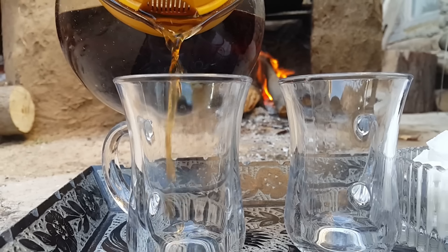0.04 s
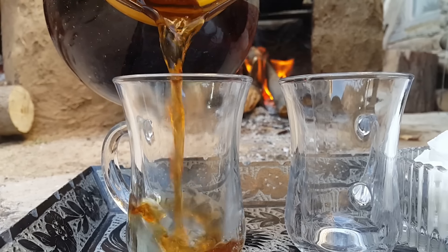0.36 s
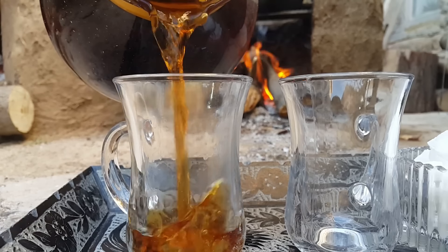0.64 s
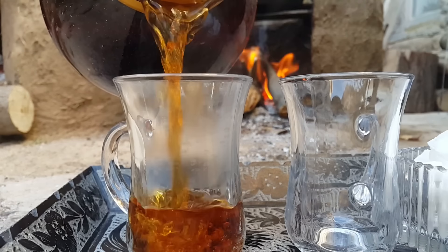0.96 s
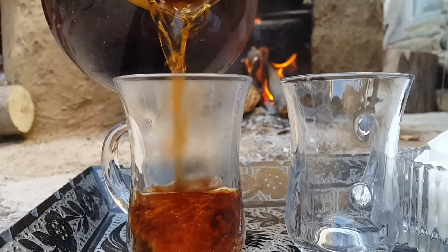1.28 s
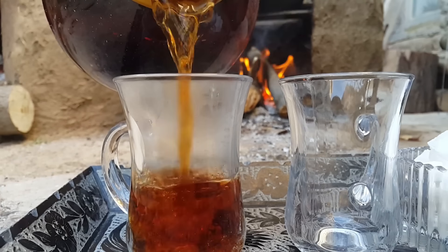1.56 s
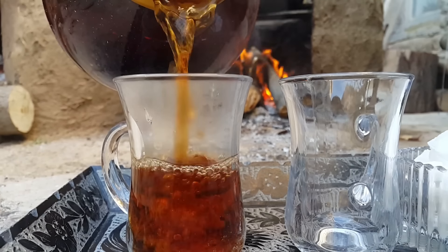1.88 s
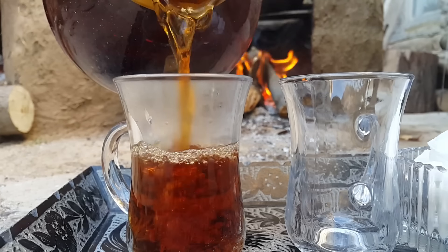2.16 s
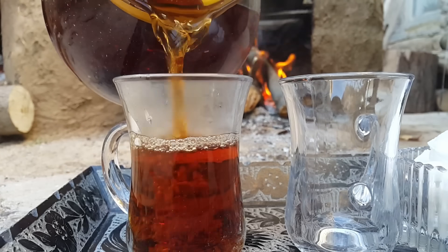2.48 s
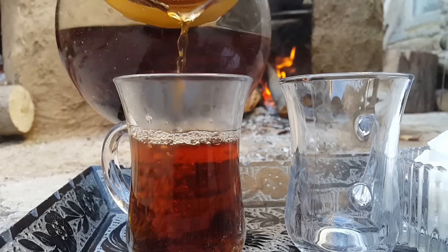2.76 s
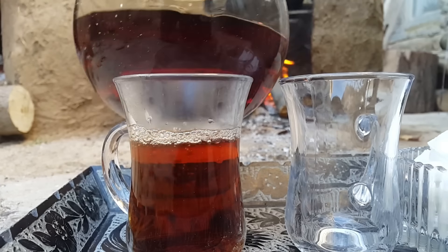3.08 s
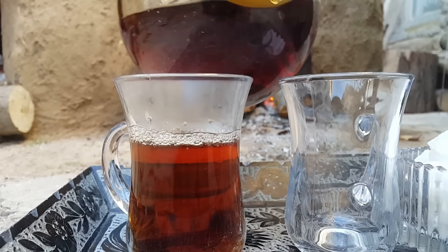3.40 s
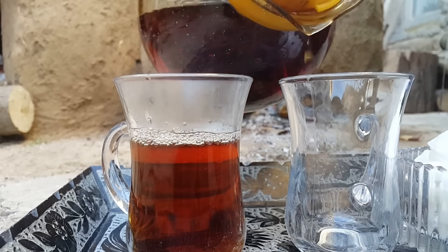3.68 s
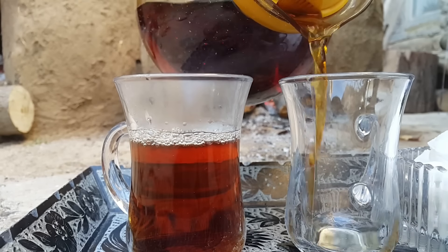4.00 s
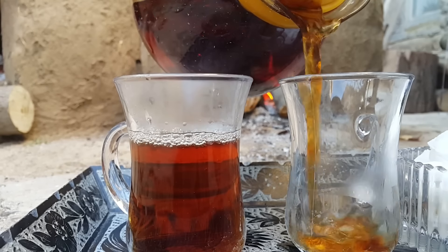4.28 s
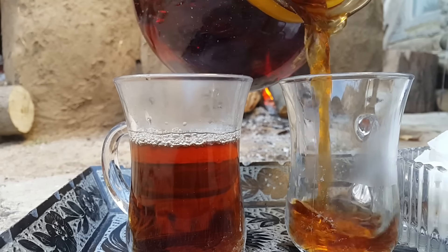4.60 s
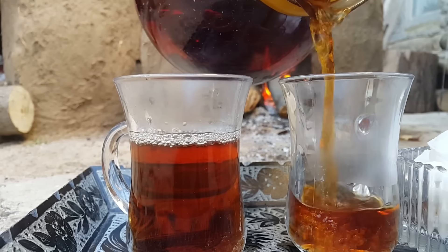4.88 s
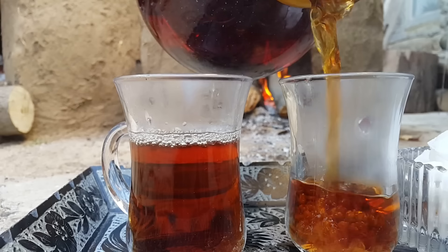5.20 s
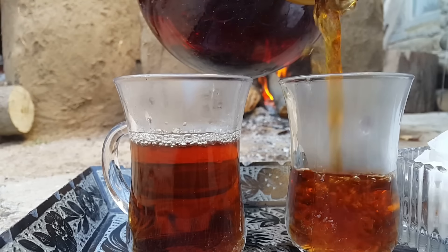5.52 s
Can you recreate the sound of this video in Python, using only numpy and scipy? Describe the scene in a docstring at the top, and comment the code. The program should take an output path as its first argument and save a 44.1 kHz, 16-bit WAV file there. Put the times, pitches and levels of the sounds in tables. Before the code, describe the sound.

Hot tea is poured from a glass teapot into a small glass, close to the microphone. The stream bubbles and gurgles, with small plops, ticking droplets and a light fizz of foam. It tails off and the pot knocks once. After a short pause, a second pour splashes into another glass. A soft hiss and the faint, low flutter of a fire lie behind it all.

```python
"""Hot tea is poured from a glass teapot into two small glasses on a metal tray, close by.
The stream traps bubbles. They ring in clear tea and turn into dull plops as it gets frothy.
The tea's own note sinks, while the shrinking column of air above it rings higher.
Droplets tick and foam fizzes. Between the pours the pot knocks once.
Behind it all are a soft hiss and the low flutter of a fire."""
import sys
import numpy as np
from scipy import signal
from scipy.fft import rfft, irfft
from scipy.io import wavfile
from scipy.ndimage import uniform_filter1d

SR = 44100
rng = np.random.default_rng(int(sys.argv[2]) if len(sys.argv) > 2 else 0)


def digitize_waveform(pressure):
    """Quantize a signal to 16-bit integers and store it at the path in sys.argv[1].

    Rows of a 2-D input are taken as channels; values are limited to [-1, 1].
    """
    field = np.atleast_2d(pressure).T
    bounded = np.clip(field, -1, 1)
    quanta = np.round(bounded * 32767).astype(np.int16)
    wavfile.write(sys.argv[1], SR, quanta)


N = 249165
TIME = np.arange(N) / SR

# The tone of the hiss and the fire. Each row: frequency in Hz, relative level in dB.
BACKGROUND_TONE = [(15, -49), (25, -27), (55, -11.5), (92, -9.5), (135, -2.5), (240, -5.5), (299, -9),
                   (371, -15), (473, -12), (620, -15.5), (791, -8), (929, -14.5), (1180, -14.5),
                   (1390, -25), (2000, -18), (2700, -16), (3050, -13.5), (3600, -17.5), (4050, -15.5),
                   (4950, -21), (7630, -41.5), (15800, -37)]
# How alike the background is in both ears. Each row: frequency in Hz, likeness (1 means the same).
EAR_LIKENESS = [(60, 0.95), (290, 0.91), (700, 0.95), (1400, 0.28), (2600, 0.15), (4400, -0.062),
                (15000, -0.04)]
# The fire's low puffs. Each row: start in seconds, level in dB, pitch in Hz.
FIRE_PUFFS = [(0.11, -50, 248), (0.511, -42, 224), (0.944, -45, 236), (3.182, -47, 220),
              (3.261, -43.5, 232), (3.575, -41.5, 203), (3.737, -43, 234), (4.613, -42.5, 226),
              (4.695, -44.5, 246), (5.096, -44.5, 230), (5.245, -39.5, 230), (5.521, -38, 236)]
# The echo of the walls. Each row: frequency in Hz, seconds it takes to fade by 60 dB.
WALL_FADES = [(150, 0.38), (800, 0.12), (3000, 0.35), (12000, 0.027)]
# Echoes off the pot, the tray and the other glass.
# Each row: left delay in seconds, right delay in seconds, level in dB.
NEAR_ECHOES = [(.0019, 0.0033, -52), (.0033, 0.00291, -26.5), (.0061, .0068, -18.5)]
# The pot touches, lands and chatters once. Each row: start in seconds, relative level in dB.
POT_CONTACTS = [(3.1218, -13.7), (3.1239, 0), (3.1263, -11.7)]
# The notes of the knocked pot. Each row: pitch in Hz, relative level in dB,
# seconds to fade by 60 dB, how much louder it is on the left in dB.
POT_NOTES = [(169, -37.0, 0.203, 1), (359, -46, 0.129, 0), (485, -37.0, 0.097, -1), (650, -38, 0.11, 4),
             (824, -20.5, 0.115, -3), (889, -24, 0.09, -1), (944, -13.5, 0.039, -1),
             (1087, -4.4, 0.014, -7), (1211, -15, 0.042, -9), (1294, -13.4, 0.03, -5),
             (1449, -15, 0.025, -2), (1581, -37, 0.08, 1), (1728, -27, 0.075, -3), (1950, -27, 0.045, -3),
             (2214, -32.0, 0.028, 3), (2620, -26.5, 0.04, 3), (2800, -24.5, 0.027, 5),
             (3380, -32.0, 0.03, -8), (3686, -33, 0.024, -6), (4410, -34, 0.02, 1), (8560, -60, 0.06, 0),
             (9400, -59, 0.05, 0), (10450, -59, 0.05, 0)]
# The tone of four noises: the pot's crack, foam, droplets and wet slaps.
# Each row: frequency in Hz, relative level in dB.
CRACK_TONE = [(100, -27), (500, -3), (1200, 2.5), (2600, -9), (4500, -13), (6000, -28), (9000, -24.5),
              (15500, -36)]
FOAM_TONE = [(800, -1), (1800, -0.5), (2600, 0), (3900, 1.5), (5000, -4), (7000, -23), (15500, -24.5)]
DROPLET_TONE = [(800, -10), (1450, 18), (2000, 7), (2700, 4.5), (4000, -1), (5300, -6.5), (5750, -4),
                (6500, -15.5), (9500, -17.5), (15500, -12.5)]
SLAP_TONE = [(800, -1), (1900, 2), (3900, -3), (5000, -11), (7000, -33), (15500, -38)]
# Droplets hitting the tea (duller) or the side of the glass (brighter).
# Each row: start in seconds, relative level in dB, a value in Hz that sets how bright the tick is.
DROPLETS = [(0.6385, -48, 6200), (0.6414, -42, 2200), (0.6496, -42.5, 5460), (0.683, -40.5, 3300),
            (0.689, -40, 3000), (0.7505, -42.5, 2400), (0.761, -46, 5000), (0.7727, -44, 2600),
            (0.801, -41.5, 3200), (0.813, -53, 13000), (0.9617, -54, 6500), (0.922, -47, 2700),
            (0.9275, -46, 3320), (0.993, -47, 2594), (1.012, -51, 12000), (1.029, -48, 7500),
            (1.0433, -56, 11000), (1.06, -43.5, 7500), (1.171, -51, 8000), (1.212, -40, 6000),
            (1.231, -43, 5800), (1.269, -50, 9500), (1.277, -40, 5750), (1.2886, -52, 6500),
            (1.304, -58, 4500), (1.3856, -49, 4200), (1.4132, -50, 3000), (1.484, -52, 8000),
            (1.4925, -42, 3600), (1.508, -42, 3000), (1.659, -38.5, 3600), (1.724, -57, 10000),
            (1.7355, -39, 1800), (1.761, -44, 7000), (1.787, -52, 11000), (1.8165, -48, 8000),
            (1.8352, -44, 4000), (1.883, -40, 6030), (1.909, -42.5, 2820), (1.982, -54, 11000),
            (2.011, -45, 2000), (2.0443, -53, 12000), (2.0616, -58, 12000), (2.0895, -42, 2194),
            (2.1414, -54, 8000), (2.148, -43, 3200), (2.169, -48, 3600), (2.2127, -44, 2600),
            (2.2356, -45, 4200), (2.2515, -46, 2000), (2.366, -45, 6460), (2.3745, -40, 2400),
            (2.377, -41.5, 7200), (2.405, -56, 10900), (2.4136, -53, 11000), (2.4197, -42.5, 2000),
            (2.4452, -52, 10000), (2.5296, -51, 10000), (2.5965, -41.5, 5030), (2.6696, -53, 9000),
            (2.692, -44.5, 2400), (2.7132, -43, 2600), (2.7257, -45, 2800), (2.7507, -47, 4000),
            (2.7578, -47.5, 9900), (2.7712, -40.5, 2100), (2.8283, -60, 12000), (2.8897, -55, 12000),
            (2.9075, -50, 11000), (2.935, -48, 7000), (2.943, -39.5, 2000), (3.024, -38, 2000),
            (4.359, -50, 7000), (4.482, -44, 4000), (4.492, -44, 2800), (4.542, -42, 3800),
            (4.5643, -51, 2600), (4.783, -40, 3570), (5.0114, -51, 4500), (5.031, -50, 3800),
            (5.1203, -48, 4000), (5.2664, -45, 4000), (5.3114, -44, 1900), (5.3564, -47, 8000),
            (5.3696, -41, 5000), (5.5186, -56, 8000), (5.5398, -43, 2200), (5.5605, -37.5, 2400),
            (5.561, -50, 13000), (5.5948, -53, 9000), (5.6116, -53, 10000)]
# Small bubbles at the surface. Each row: start in seconds, relative level in dB, pitch in Hz.
SURFACE_BUBBLES = [(0.6885, -39, 1700), (0.7603, -34, 3680), (0.9225, -39, 2650), (0.9285, -35, 3100),
                   (1.2296, -24, 3670), (1.2768, -29, 3650), (1.4126, -36, 2550), (1.4932, -35, 1860),
                   (1.4941, -35, 3630), (1.658, -36, 1900), (1.884, -31, 3830), (2.1683, -37, 1900),
                   (2.149, -32, 3800), (2.5302, -31, 1885), (2.596, -39, 1900), (3.0242, -33, 2000),
                   (4.364, -45, 4250), (4.395, -45, 4100), (4.483, -38, 4160), (4.4918, -36, 4160),
                   (4.539, -39, 2315), (4.654, -32.5, 3890), (4.7695, -41, 1480), (4.784, -37, 1570),
                   (4.841, -40, 1450), (5.0115, -41, 3070), (5.0838, -36, 3520), (5.295, -38, 3760),
                   (5.3568, -40, 4020), (5.54, -39, 3770), (5.5606, -37, 1550), (5.6115, -38, 3400),
                   (5.6138, -33, 4150)]
# Plops of air trapped by the stream. Each row: start in seconds, relative thud level in dB,
# relative ring level in dB, the note heard in Hz (often the glass's note near 1080 Hz),
# cycles for that note to fade to about a third.
PLOP_EVENTS = [(0.2712, -40, -46, 890, 0.71), (0.303, -41, -45.5, 930, 0.87), (0.3405, -49, -48, 796, 1.7),
               (0.6413, -36, -31.5, 1013, 2.9), (0.6835, -45, -36, 1140, 1.9),
               (0.6897, -30, -31.5, 1310, 7.1), (0.759, -39, -38.5, 1053, 10),
               (0.7667, -44, -38.5, 1056, 6.1), (0.801, -38, -30.5, 1070, 5.5),
               (0.922, -41.0, -45.5, 1042, 14), (0.9565, -30, -37, 1070, 4.6),
               (0.9624, -18.5, -28, 1075, 7.4), (1.0023, -36, -27.5, 1346, 8.6),
               (1.0115, -25, -28, 774, 3.8), (1.028, -52, -28.5, 1130, 2.3),
               (1.0594, -39, -27.5, 1088, 7.3), (1.0792, -27, -31, 1252, 6),
               (1.098, -21.5, -29.5, 1077, 5.1), (1.114, -38, -40, 1005, 9.8),
               (1.1249, -18.5, -29, 1100, 4), (1.1704, -52, -30, 1060, 3.6),
               (1.1886, -50.0, -29.5, 1070, 3.3), (1.2119, -22.5, -31.5, 606, 1.6),
               (1.2287, -40, -29, 1116, 3.4), (1.2656, -42, -29, 797, 5.6), (1.2758, -22, -34, 760, 2.9),
               (1.2889, -20.5, -38, 760, 3.8), (1.3033, -20.5, -31, 755, 3.7),
               (1.3664, -14, -29.0, 1043, 7.7), (1.3815, -23.5, -32, 1100, 10.0),
               (1.4119, -25.5, -34.5, 1180, 4.9), (1.4441, -27.5, -40.5, 257, 2.7),
               (1.477, -35, -47, 270, 1.3), (1.4937, -19, -26, 1110, 5.2), (1.5147, -21, -30, 1060, 7.7),
               (1.555, -20, -49, 165, 1.2), (1.57, -33, -40, 1090, 2), (1.588, -17, -28, 477, 0.47),
               (1.6113, -21.5, -30.5, 1065, 7.8), (1.631, -45, -30.5, 595, 0.51),
               (1.6591, -24, -27.5, 1230, 2), (1.674, -22.5, -35, 178, 1), (1.721, -25.5, -42.5, 390, 1.8),
               (1.7358, -30, -34, 1100, 5.1), (1.783, -25.5, -49, 280, 2.4), (1.814, -30, -44, 304, 1.3),
               (1.8853, -17, -15, 1025, 0.69), (1.8894, -41, -30, 1420, 3.2), (1.9027, -33, -34, 730, 3.9),
               (2.0017, -28, -41, 335, 1.2), (2.0115, -30, -29.5, 750, 0.7), (2.0235, -39, -46.5, 270, 1.2),
               (2.0445, -43, -43, 900, 1), (2.0898, -33, -22, 706, 0.28), (2.112, -42.5, -28, 860, 2),
               (2.141, -35, -37, 900, 1.5), (2.1573, -25.5, -37, 1010, 5.9),
               (2.1686, -26.5, -29, 1044, 5.1), (2.18, -27, -45, 284, 1.1), (2.2054, -40, -40.5, 232, 1.9),
               (2.2129, -23, -35, 900, 0.88), (2.2358, -38, -34, 1020, 2), (2.2516, -31, -33.5, 840, 4.7),
               (2.303, -25.5, -53, 370, 5), (2.323, -35, -43, 885, 1.5), (2.3666, -31, -33, 1113, 6),
               (2.4145, -26, -37, 840, 1.9), (2.43, -33, -41, 238, 1.6), (2.445, -38, -38, 846, 1.5),
               (2.504, -50.0, -26.5, 725, 0.64), (2.53, -19, -34.5, 833, 5.5), (2.562, -42, -35, 1160, 2.9),
               (2.5961, -29.0, -30, 766, 4.3), (2.613, -50, -47, 245, 0.83), (2.65, -35, -41, 796, 1.8),
               (2.68, -33, -50, 254, 1.1), (2.715, -33, -48, 1100, 2), (2.836, -39, -37, 810, 1.8),
               (2.891, -36, -41, 860, 2.6), (2.909, -25.5, -37.5, 863, 9.3),
               (3.0242, -29.5, -33, 1080, 2.7), (4.441, -55, -40.5, 980, 7), (4.4823, -43, -35, 1004, 3.5),
               (4.5358, -31, -34.5, 1330, 3.3), (4.6746, -42, -48.5, 1054, 9),
               (4.7247, -38, -44.5, 1055, 3.7), (4.767, -41, -43, 1060, 22),
               (4.7839, -42, -24.5, 1068, 2.8), (4.8084, -34, -37, 783, 8.3),
               (4.8404, -47.5, -36.5, 1110, 5.6), (4.8649, -40, -28, 1046, 6.7),
               (4.8967, -38, -39, 1085, 3.1), (4.927, -33.5, -41.5, 1060, 7.2),
               (4.9573, -32, -41, 1058, 4.7), (4.9825, -25.5, -40.5, 1084, 11),
               (5.0119, -30, -31, 940, 3.9), (5.0318, -52, -21, 890, 0.9), (5.0553, -35, -44, 1050, 3),
               (5.081, -30, -48, 562, 9), (5.1203, -38, -43, 975, 3.1), (5.1298, -36, -47, 760, 7.0),
               (5.189, -37, -42.5, 1100, 3.5), (5.2044, -25, -46, 787, 10.0), (5.2115, -34, -36, 500, 0.61),
               (5.2403, -39, -44, 1000, 2), (5.255, -33, -45, 1110, 1.4), (5.2656, -31, -26.5, 1010, 1.5),
               (5.282, -42, -35, 950, 4.8), (5.289, -36, -37.5, 279, 1.3), (5.2959, -18.5, -38, 1224, 8.8),
               (5.312, -27.5, -38, 1340, 1.6), (5.3583, -24, -41, 500, 5.7),
               (5.3696, -28, -39.5, 425, 0.43), (5.4757, -27.5, -50, 513, 11), (5.514, -46, -38, 950, 2.5),
               (5.5389, -29, -33, 990, 1.7), (5.5605, -20, -27.5, 890, 5.1), (5.612, -27, -49, 980, 2)]
# The stream as the pot is tipped and raised, twice. Each row: time in seconds, strength in dB.
STREAM_STRENGTH = [(0.2, -45), (.3, -15.5), (.55, -15), (.87, -9.5), (1.0, -0.5), (1.3, 2), (1.55, 3.5),
                   (1.95, -2), (2.5, -3), (2.95, -2), (3.3, -18), (4.25, -21), (4.45, -17), (4.65, -12.5),
                   (4.9, -1.5), (5.05, -1.5), (5.16, -5.5), (5.3, -3), (5.42, -3), (5.55, -0.5), (5.65, -2)]
# The two pours. Each row: the times in seconds when the glass takes over, starts filling and is half
# frothy; the right ear's delay in seconds; the air column's left and right levels in dB;
# the column's right-ear delay in seconds; the height of air left in the full glass in metres.
TWO_POURS = [(0, 0.398, 1.19, .00014, 3, 6.5, 0.00028, 0.056),
             (3.804, 4.652, 5.085, -.00003, 6.5, 7.5, 0.00012, 0.055)]
# The steady notes of glass and tray. Each row: pitch in Hz, width in Hz, level in dB.
GLASS_AND_TRAY_NOTES = [(572, 16, 5.5), (835, 36, -5), (1900, 260, -7), (3620, 260, 3)]

AIR_START_M, SOUND_M_PER_S = 0.0816, 343  # height of the air before filling; speed of sound
EARLY = TIME[:SR // 3]  # the first third of a second


def amp(db):
    """Turns decibels into a number to multiply by."""
    return 10 ** (np.asarray(db) / 20)


def unit(x):
    """Scales a signal so its average strength (rms) is 1."""
    return x / np.sqrt(np.mean(x ** 2) + 1e-20)


def look_up(table, hz):
    """Reads between the rows of a frequency table, with octaves evenly spaced."""
    row_hz, value = np.transpose(table)
    return np.interp(np.log(hz + 1), np.log(row_hz + 1), value)


def add(mix, s, sound):
    """Mixes a sound in, starting at s seconds."""
    part = mix[..., max(round(s * SR), 0):][..., :sound.shape[-1]]
    part += sound[..., :part.shape[-1]]


def delayed(x, s):
    """Delays a sound by s seconds, even by less than one sample."""
    hz = np.fft.rfftfreq(2 ** 18, 1 / SR)
    return irfft(rfft(x, 2 ** 18) * np.exp(-2j * np.pi * hz * s))[:N]


def low_cut(x, hz):
    """Thins out the bass below hz."""
    return signal.sosfilt(signal.butter(2, hz, "high", fs=SR, output="sos"), x)


def resonate(x, hz, width_hz):
    """Makes a sound ring at a pitch that may glide; a smaller width rings longer."""
    turn = np.exp(2j * np.pi * np.cumsum(hz * np.ones(len(x))) / SR)
    decay = np.exp(-np.pi * width_hz / SR)
    return 2 * (turn * signal.lfilter([1 - decay], [1, -decay], x / turn + 1e-18)).real


def shaped_noise(tone, size):
    """A separate noise for each ear, shaped by a tone table."""
    gain = amp(look_up(tone, np.fft.rfftfreq(size, 1 / SR)))
    return unit(irfft(rfft(rng.standard_normal((2, size))) * gain, size))


def burst(tone, fade_s):
    """A short noise that swells and fades."""
    age = TIME[:2048] / fade_s
    return shaped_noise(tone, 2048) * age * np.exp(1 - age)


def blip(hz, fade_cycles, rise, swell_cycles):
    """A note that swells and fades; rise lifts its pitch, like a bubble nearing the surface."""
    cycles = TIME[:1500] * hz
    life = cycles / max(fade_cycles, 0.3)
    shape = (1 - np.exp(-(cycles / swell_cycles) ** 2)) * np.exp(-life)
    return shape / shape.max() * np.sin(2 * np.pi * cycles * (1 + rise * np.tanh(life / 2)))


def hiss_and_fire(level_db, flutter_db, flutter_top_hz, hiss_waver_db):
    """A wide, steady hiss with the uneven low flutter of the fire beneath it."""
    hz = np.fft.rfftfreq(1024, 1 / SR)
    noise = rng.standard_normal((5, N // 256 + 5, len(hz)))  # five grids of time by frequency
    left, unrelated = noise[0] + 1j * noise[1], noise[2] + 1j * noise[3]
    waver = uniform_filter1d(noise[4], size=4, axis=0)
    waver = unit(uniform_filter1d(waver, size=6, axis=1))
    alike = look_up(EAR_LIKENESS, hz)
    right = alike * left + np.sqrt(1 - alike ** 2) * unrelated
    spectrum = np.array([left, right]) / np.sqrt(1 + alike)
    depth_db = hiss_waver_db + flutter_db / (1 + (hz / flutter_top_hz) ** 2)
    spectrum *= amp(look_up(BACKGROUND_TONE, hz) + waver * depth_db)
    sound = signal.istft(spectrum, nperseg=1024, noverlap=768, time_axis=1, freq_axis=2)[1][:, :N]
    return amp(level_db) * sound / sound.mean(0).std()


def fire_puffs():
    """Now and then the fire gives a soft, low puff."""
    out = np.zeros(N)
    for s, db, hz in FIRE_PUFFS:
        add(out, s, amp(db) * blip(hz, fade_cycles=0.68, rise=0, swell_cycles=0.7))
    return out


def with_walls(x, tail_db):
    """The walls around the fire add a faint, short tail of echoes."""
    hz, t, noise = signal.stft(rng.standard_normal((2, SR // 3)), SR, nperseg=256)
    fade = amp(-60 * t / look_up(WALL_FADES, hz)[:, None])
    tail = signal.istft(noise * fade, SR, nperseg=256)[1]
    tail *= np.minimum(TIME[:tail.shape[1]] / 0.0066, 1)  # a soft start
    tail /= np.linalg.norm(tail[0])
    return x + amp(tail_db) * signal.fftconvolve(x, tail, axes=1)[:, :N]


def with_near_echoes(x):
    """Nearby surfaces each send back a quick, quieter copy."""
    return x + sum(amp(db) * np.array([delayed(x[0], left_s), delayed(x[1], right_s)])
                   for left_s, right_s, db in NEAR_ECHOES)


def pot_knock(ring_db, crack_db, crack_fade_s, grind_db):
    """Each hard contact makes a crack, a short grind and the quickly fading ring of the full pot."""
    side = np.array([[0.5], [-0.5]])  # left ear, right ear
    age = np.maximum(EARLY - (side + 0.5) * 0.00022, 0)  # the right ear hears the ring first
    ring = sum(amp(db + side * left_db - 60 * age / fade_s) * np.sin(2 * np.pi * hz * age)
               for hz, db, fade_s, left_db in POT_NOTES)
    ring *= 1 - np.exp(-age / 0.0009)  # a soft start
    out = np.zeros((2, N))
    for s, db in POT_CONTACTS:
        crack = amp(db + crack_db) * burst(CRACK_TONE, crack_fade_s)
        add(out, s, amp(db + ring_db) * ring)
        add(out, s - crack_fade_s, crack)
        add(out, s, amp(db + grind_db) * burst(CRACK_TONE, fade_s=0.004))
        add(out, s + 0.026, amp(-19) * crack)  # a wall sends the crack back
    return out


def stream_db(s):
    """How strong the stream is at s seconds."""
    return np.interp(s, *np.transpose(STREAM_STRENGTH))


def pour_at(s):
    """The settings of the pour in use at s seconds."""
    return np.transpose(TWO_POURS)[:, np.int64(s >= TWO_POURS[1][0])]


def by_froth(s, clear, frothy, change_s=0.15):
    """Slides from the clear value to the frothy one as the stream churns the tea."""
    half_frothy_s = pour_at(s)[2]
    froth = (1 + np.tanh((s - half_frothy_s) / change_s / 2)) / 2
    return clear + (frothy - clear) * froth


def chance_events(per_s, level_db, spread_db, follow=1):
    """Random events, louder in a strong stream. Each row: start in seconds, dB, random pitch step."""
    slot_s = 1 / 400
    slots = np.arange(0, TIME[-1], slot_s)
    chance, late = rng.random((2, len(slots)))
    size, pitch = rng.standard_normal((2, len(slots)))
    db = level_db + follow * stream_db(slots) + spread_db * np.minimum(size, 1.5)
    return np.transpose([slots + late * slot_s, db, pitch])[chance < per_s * slot_s]


def foam_fizz(level_db, per_s, spread_db, fade_s, follow):
    """Foam bursts in tiny pops, mostly faint, that get louder with the stream."""
    sizes = amp(spread_db * np.minimum(rng.exponential(1, N), 4))
    pops = sizes * (rng.random(N) < per_s / SR)
    fading_pops = unit(signal.lfilter([1], [1, -np.exp(-1 / SR / fade_s)], pops))
    return amp(level_db + follow * stream_db(TIME)) * fading_pops * shaped_noise(FOAM_TONE, N)


def droplet_ticks(gain_db, fade_s, spray_hz):
    """Droplets tick as they land, some duller, some brighter; the Hz value sets how bright."""
    faint = chance_events(per_s=12, level_db=-65, spread_db=4)
    spray = [(s, db, spray_hz * np.exp(0.35 * pitch)) for s, db, pitch in faint]
    bands = np.geomspace(800, 16000, 24)
    out = np.zeros((2, N))
    for s, db, hz in [*DROPLETS, *spray]:
        band_db = look_up(DROPLET_TONE, bands) - 8 * abs(np.log2(bands / hz))  # 8 dB less per octave
        add(out, s, amp(db + gain_db) * burst(np.transpose([bands, band_db]), fade_s))
    return out


def surface_pings(gain_db, left_db, fade_s, faint_hz):
    """Small bubbles ping at the surface: a few clear ones and many faint ones."""
    events = chance_events(per_s=18, level_db=-43.5, spread_db=0.5, follow=0.47)
    faint = [(s, db, faint_hz * np.exp(0.078 * pitch)) for s, db, pitch in events]
    out = np.zeros((2, N))
    for s, db, hz in [*SURFACE_BUBBLES, *faint]:
        ping = amp(db + gain_db) * blip(hz, hz * fade_s, rise=0.005, swell_cycles=0.86)
        age, right_delay_s = TIME[:len(ping)], pour_at(s)[3]
        right = np.interp(age - right_delay_s, age, ping)
        add(out, s, np.array([amp(left_db) * ping, right]))
    return out


def wet_slaps(gain_db, fade_s):
    """Each plop starts with a short, wet slap on the surface."""
    out = np.zeros((2, N))
    for s, thud_db, ring_db, _, _ in PLOP_EVENTS:
        add(out, s, amp(max(thud_db, ring_db) + gain_db) * burst(SLAP_TONE, fade_s))
    return out


def gurgle(events, typical_hz, scatter, clear_cycles, frothy_cycles):
    """Many faint bubbles ring between the loud ones."""
    out = np.zeros(N)
    for s, db, pitch in events:
        hz = typical_hz * np.exp(scatter * pitch)
        cycles = by_froth(s, clear_cycles, frothy_cycles)
        add(out, s, amp(db) * blip(hz, cycles, rise=0.14, swell_cycles=0.54))
    return out


def plops(thud_hz, thud_gain_db):
    """Each plop is a thud and a short ring, often the glass's note near 1080 Hz."""
    out = np.zeros(N)
    for s, thud_db, ring_db, hz, ring_cycles in PLOP_EVENTS:
        thud_cycles = by_froth(s, clear=0.69, frothy=0.23)  # froth cuts the thud short
        thud = blip(thud_hz, thud_cycles, rise=0.021, swell_cycles=0.61)
        add(out, s, amp(thud_db + thud_gain_db) * thud)
        add(out, s, amp(ring_db) * blip(hz, ring_cycles, rise=0.023, swell_cycles=0.51))
    return out


def air_height(fill_s, slosh_share, slosh_hz):
    """Metres of air above the rocking tea. The glass widens, so it fills ever more slowly."""
    _, start_s, *_, full_m = pour_at(TIME)
    height = full_m + (AIR_START_M - full_m) * np.exp(-np.maximum(TIME - start_s, 0) / fill_s)
    slosh_times = np.arange(0, TIME[-1] + 1, 1 / (2 * slosh_hz))
    slosh = np.interp(TIME, slosh_times, rng.standard_normal(400)[:len(slosh_times)])
    return height * (1 + slosh_share * slosh)


def tea_in_glasses(bubbles, tea_db, direct_db):
    """Bubbles make the tea, the air above it, the glass and the tray ring."""
    tea_hz = by_froth(TIME, clear=1128, frothy=270)  # trapped air softens the tea, so its note sinks
    tea = amp(tea_db) * resonate(bubbles, tea_hz, width_hz=160)
    air_m = air_height(fill_s=1.3, slosh_share=0.028, slosh_hz=9)
    column_hz = SOUND_M_PER_S / (4 * air_m)  # the air holds a quarter of a sound wave
    column = resonate(bubbles, column_hz, width_hz=140)
    column *= (air_m / AIR_START_M) ** 0.81  # a shorter column rings less
    glass = sum(amp(db) * resonate(bubbles, hz, width) for hz, width, db in GLASS_AND_TRAY_NOTES)
    body = amp(direct_db) * bubbles + tea + glass
    out = np.zeros((2, N))
    for pour, end_s in zip(TWO_POURS, [TWO_POURS[1][0], TIME[-1]]):
        start_s, _, _, delay_s, left_db, right_db, column_delay_s, _ = pour
        left = body + amp(left_db) * column
        right = delayed(body, delay_s) + amp(right_db) * delayed(column, column_delay_s)
        out += np.array([left, right]) * ((TIME >= start_s) & (TIME < end_s))
    return out


def scene():
    """Mixes the tea, the knock and their echoes with the fire and the hiss."""
    bubbles = gurgle(chance_events(per_s=290, level_db=-45, spread_db=2),
                     typical_hz=938, scatter=0.43, clear_cycles=0.78, frothy_cycles=0.97)
    bubbles += gurgle(chance_events(per_s=70, level_db=-45.5, spread_db=2),
                      typical_hz=1068, scatter=0.142, clear_cycles=4.2, frothy_cycles=1.6)
    bubbles += plops(thud_hz=790, thud_gain_db=-2.5)
    tea = tea_in_glasses(bubbles, tea_db=4, direct_db=-12)
    tea += surface_pings(gain_db=3.5, left_db=-8, fade_s=0.0014, faint_hz=3820)
    tea += droplet_ticks(gain_db=-2, fade_s=0.0016, spray_hz=8500)
    tea += wet_slaps(gain_db=-33, fade_s=0.002)
    tea += foam_fizz(level_db=-56, per_s=500, spread_db=4, fade_s=0.003, follow=0.37)
    tea = with_near_echoes(tea)
    pot = pot_knock(ring_db=2.5, crack_db=-22, crack_fade_s=0.0009, grind_db=-37)
    near = with_walls(tea, tail_db=-18) + with_walls(pot, tail_db=-22) + fire_puffs()
    background = hiss_and_fire(level_db=-54, flutter_db=2.6, flutter_top_hz=390, hiss_waver_db=0.4)
    return low_cut(near, hz=125) + background


def record(dry):
    """The small microphone loses the deepest bass; then the highest treble is cut off."""
    thin = low_cut(dry, hz=43)
    treble_cut = signal.firwin(511, 15850, window=("kaiser", 9), fs=SR)
    return signal.oaconvolve(thin, treble_cut[None], "same")


dry = scene()
out = record(dry)
digitize_waveform(out)
```